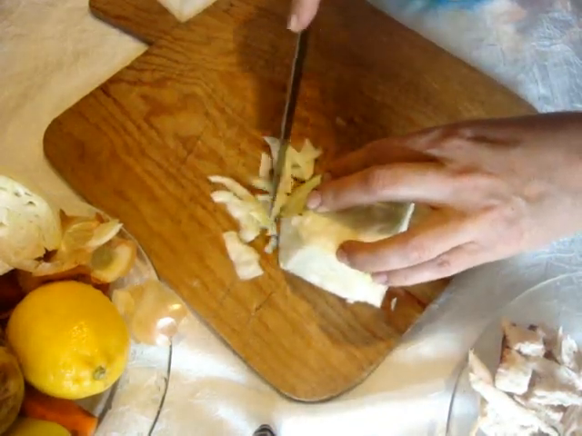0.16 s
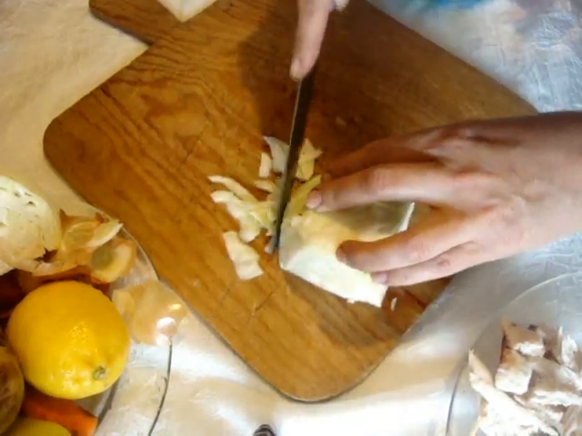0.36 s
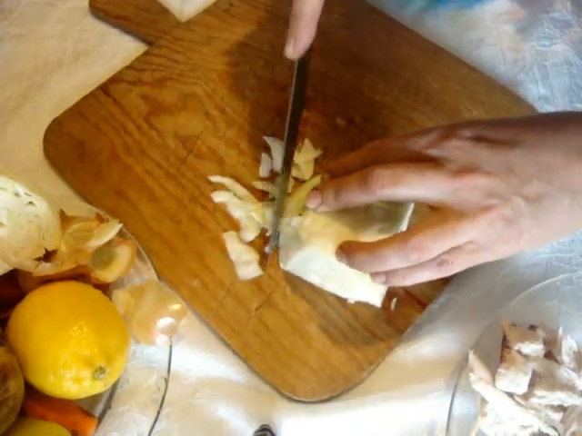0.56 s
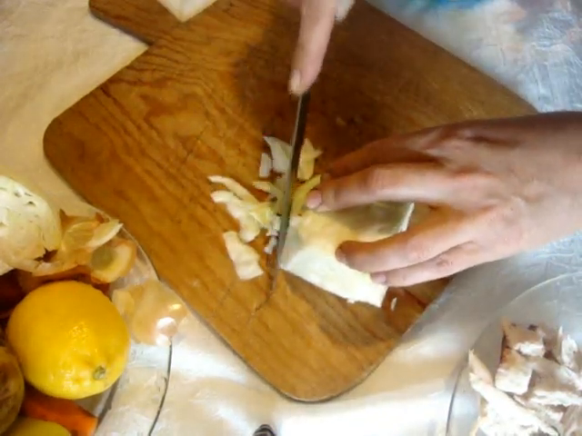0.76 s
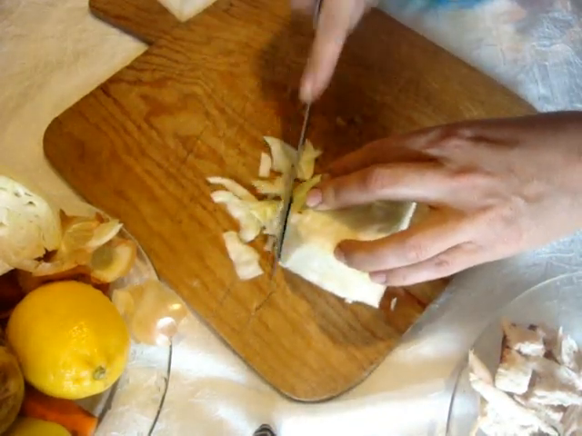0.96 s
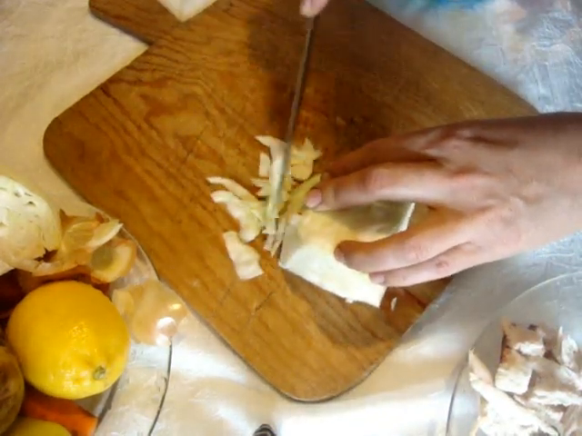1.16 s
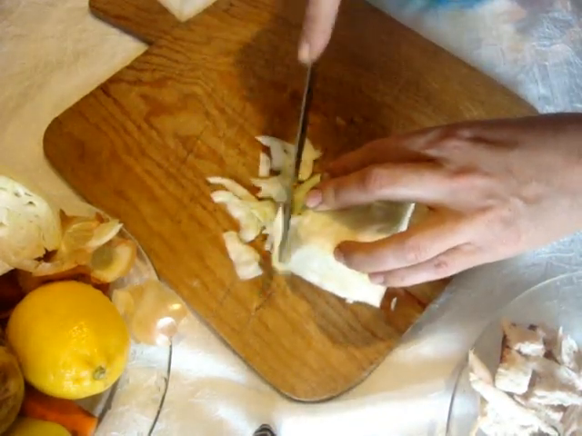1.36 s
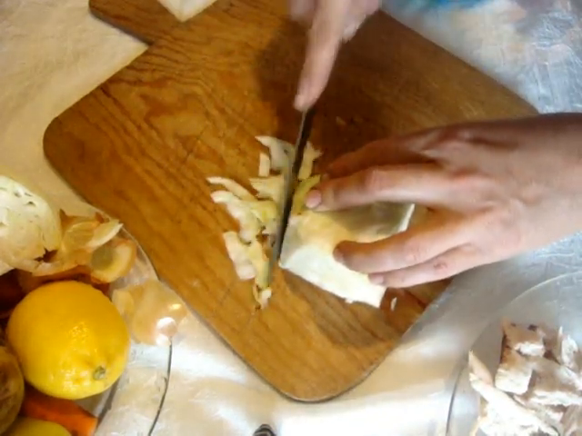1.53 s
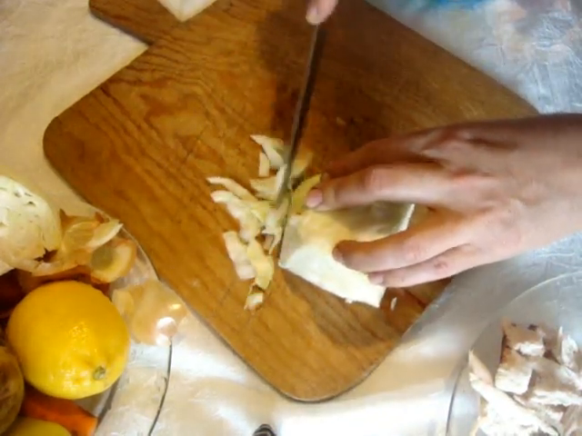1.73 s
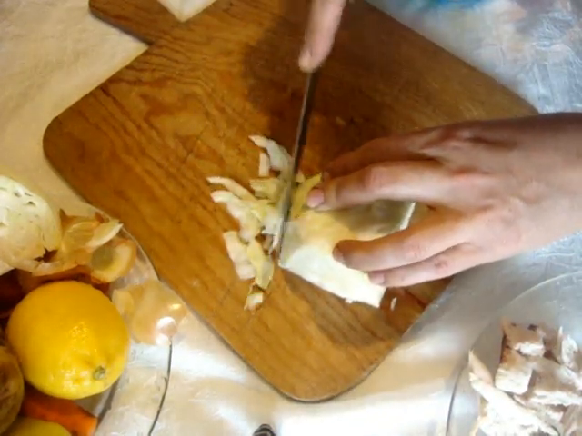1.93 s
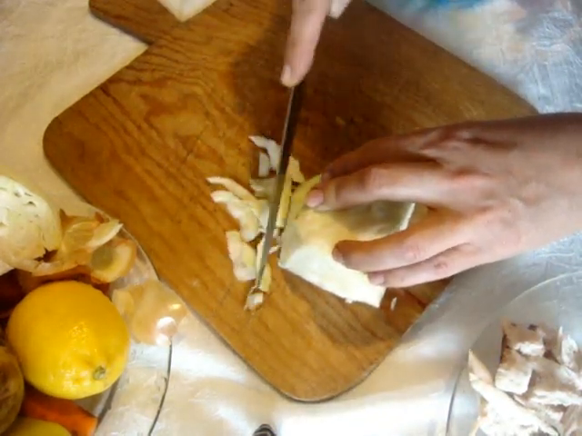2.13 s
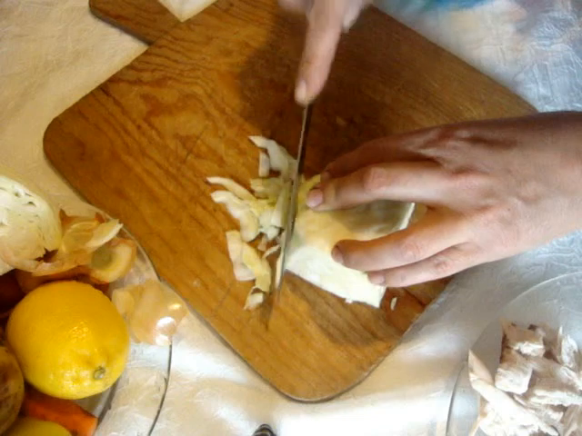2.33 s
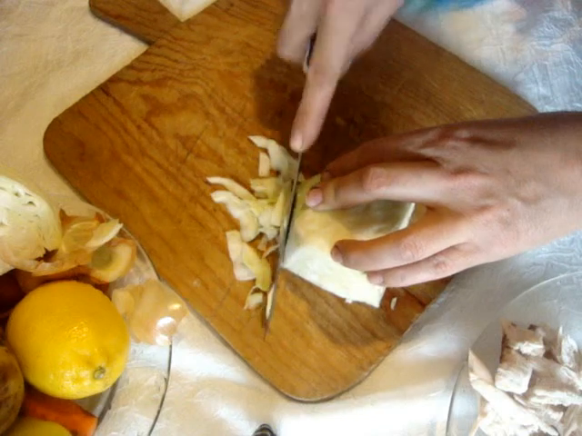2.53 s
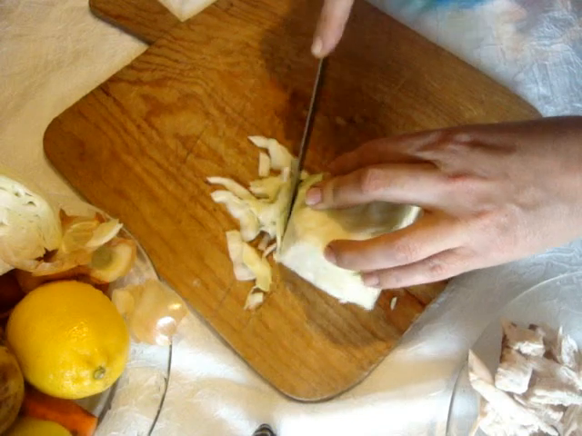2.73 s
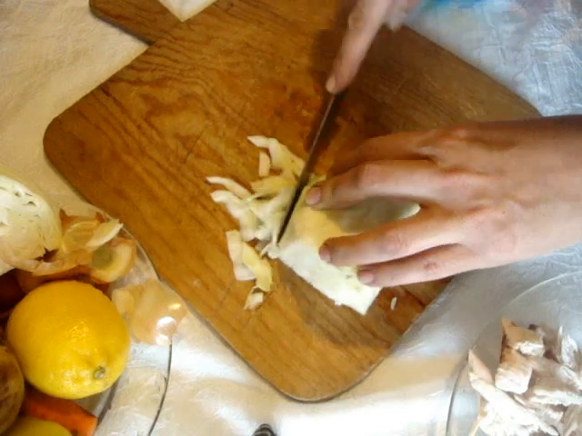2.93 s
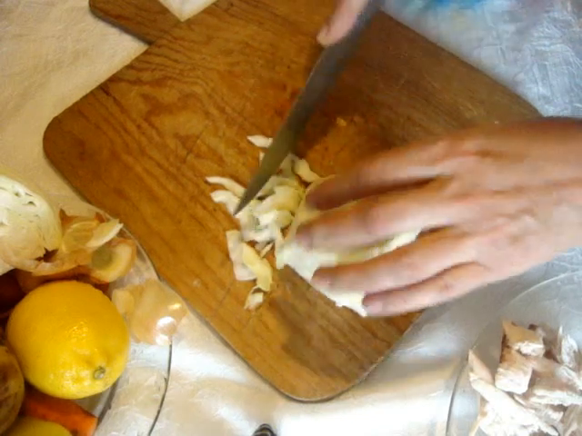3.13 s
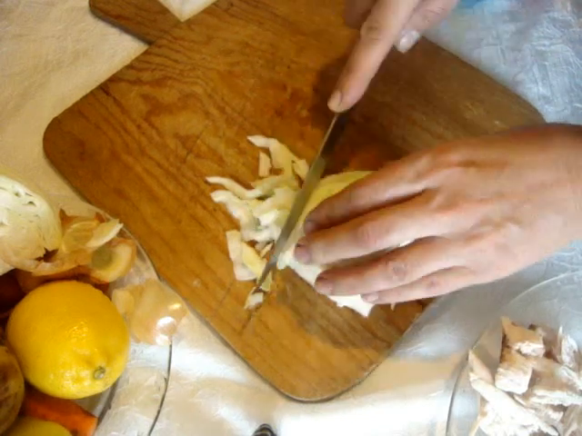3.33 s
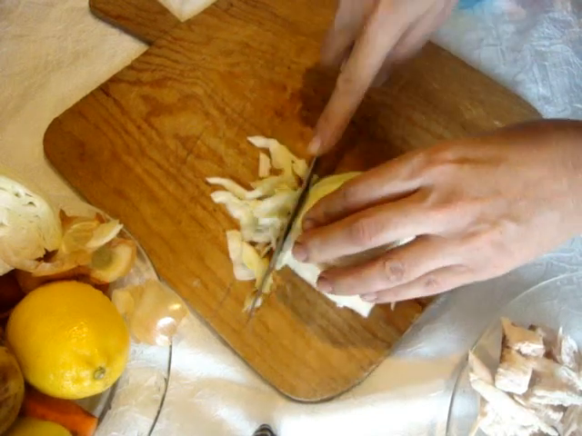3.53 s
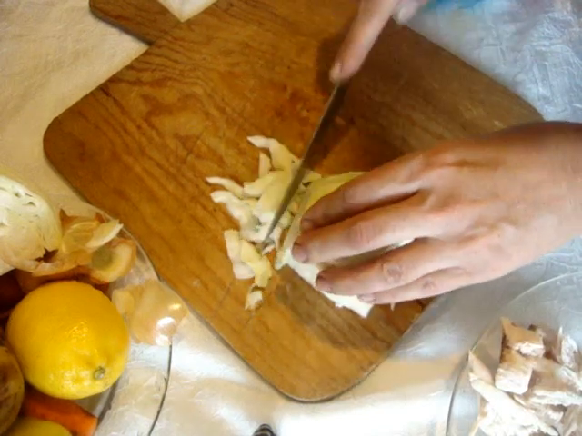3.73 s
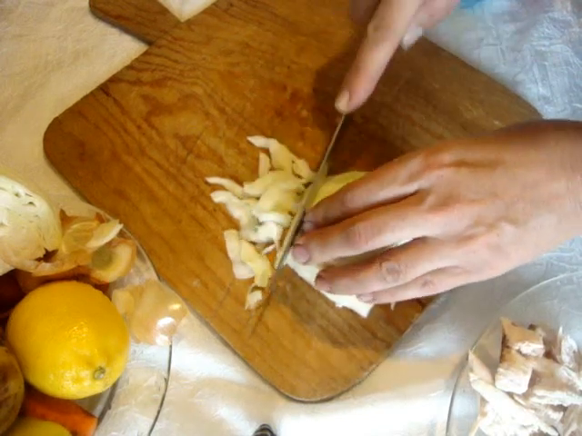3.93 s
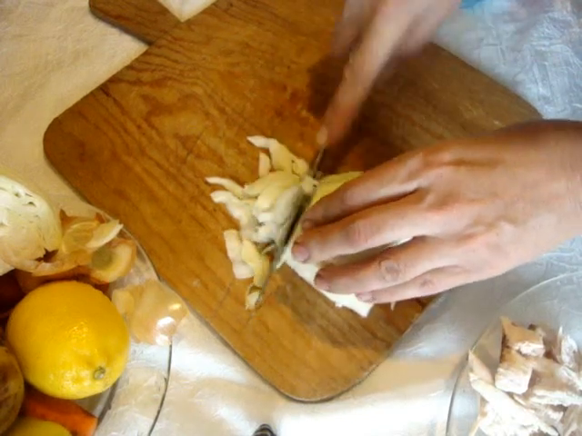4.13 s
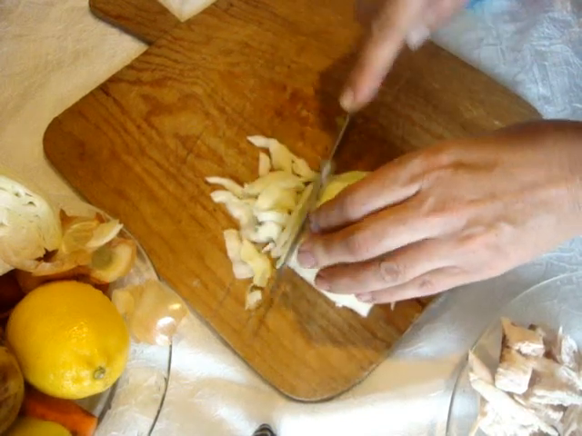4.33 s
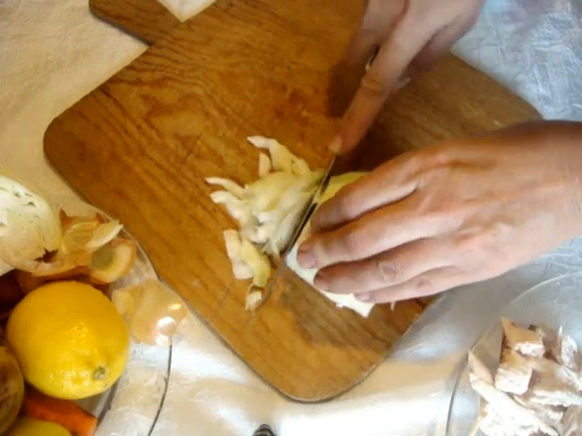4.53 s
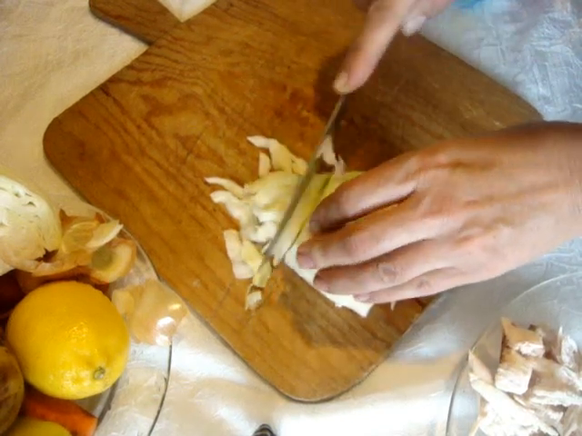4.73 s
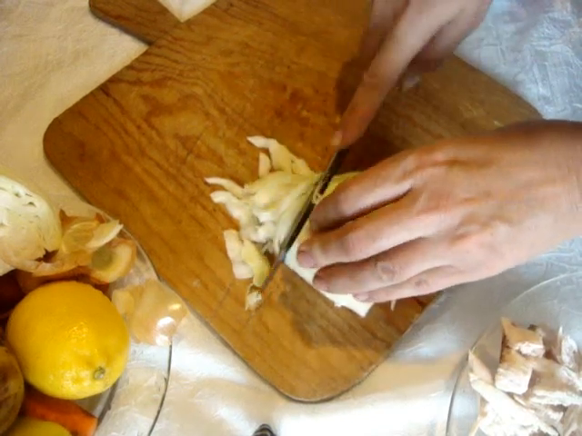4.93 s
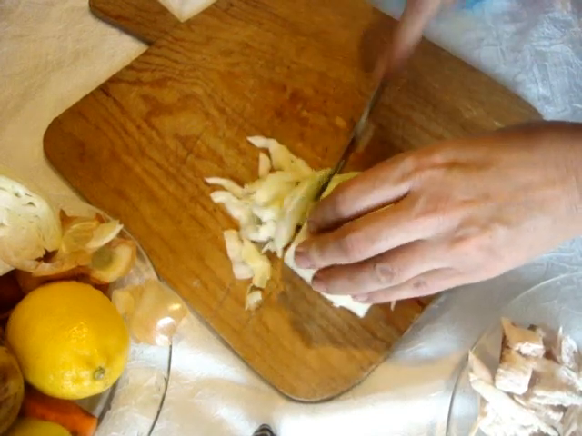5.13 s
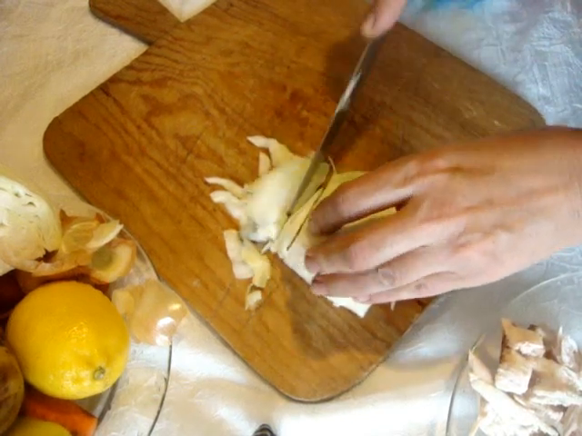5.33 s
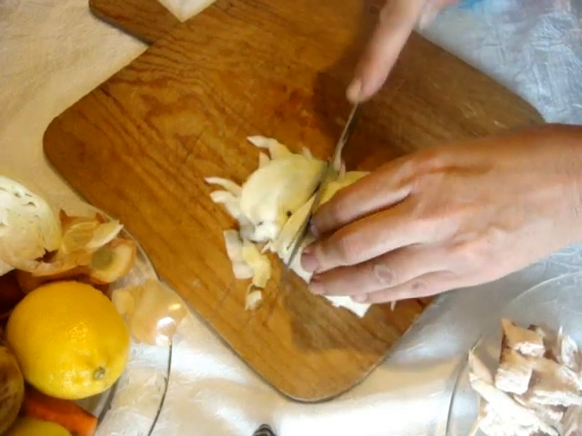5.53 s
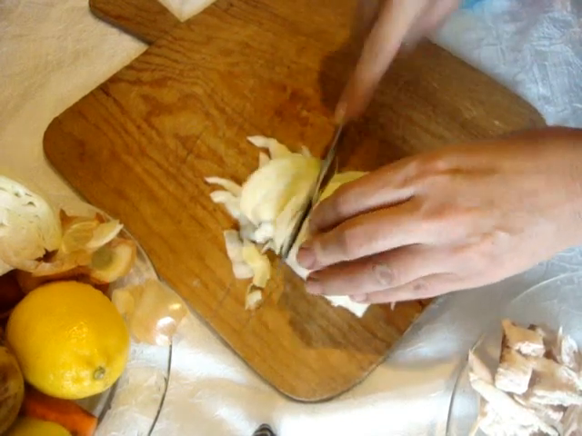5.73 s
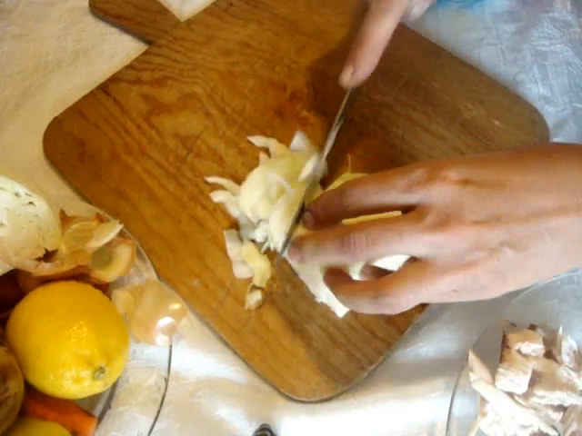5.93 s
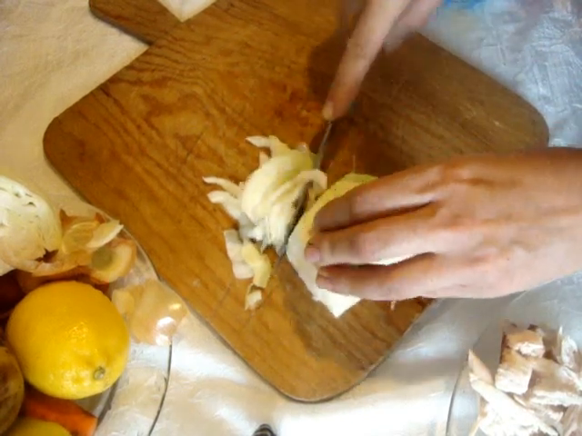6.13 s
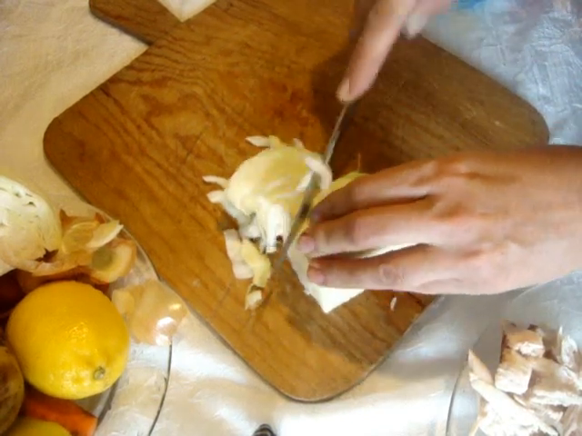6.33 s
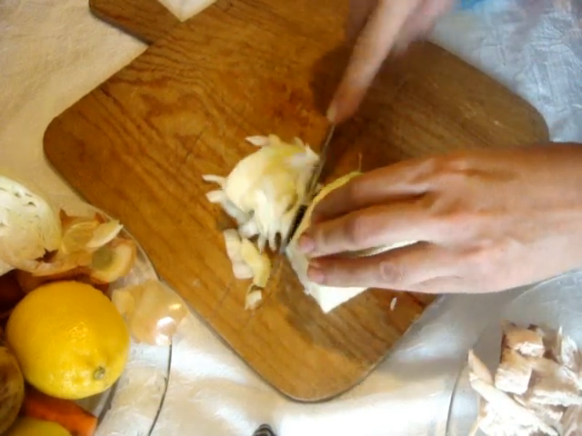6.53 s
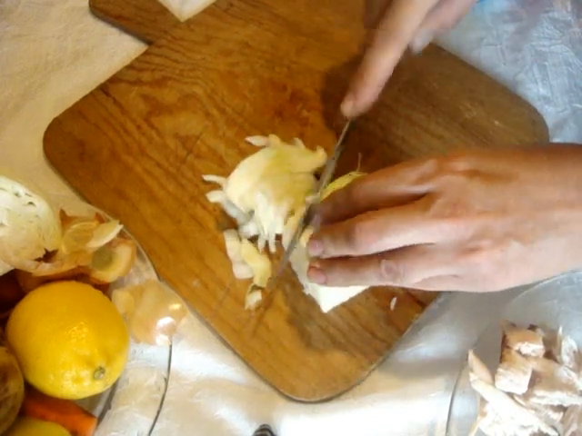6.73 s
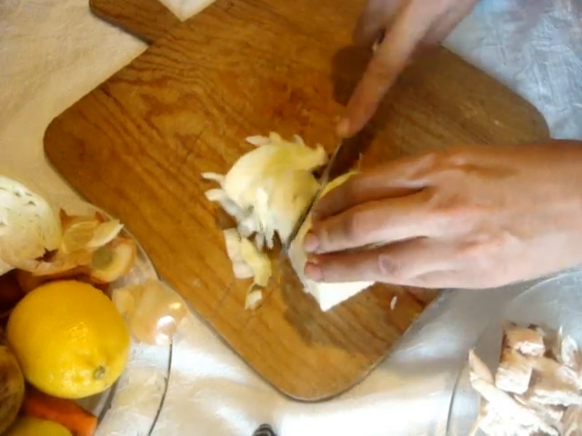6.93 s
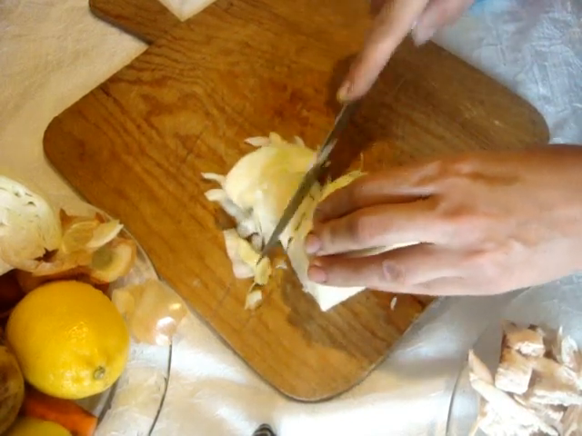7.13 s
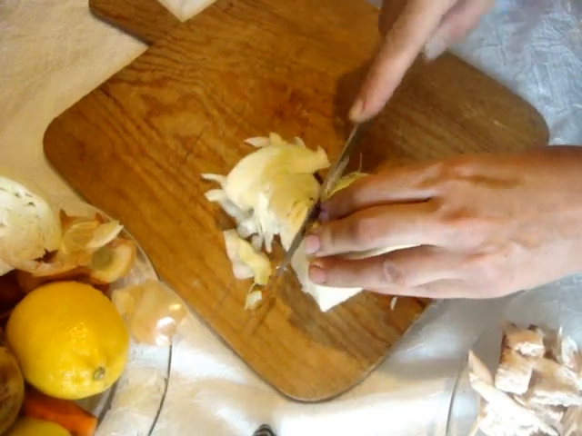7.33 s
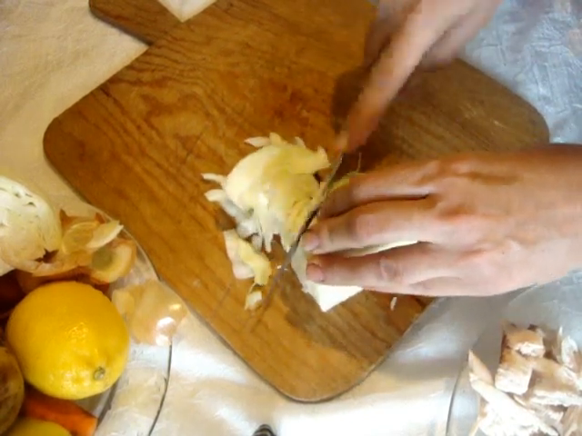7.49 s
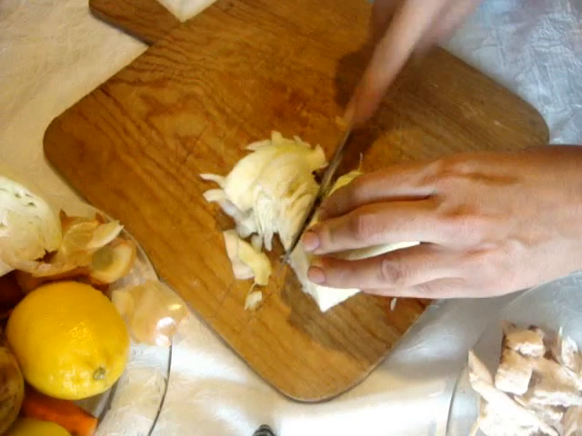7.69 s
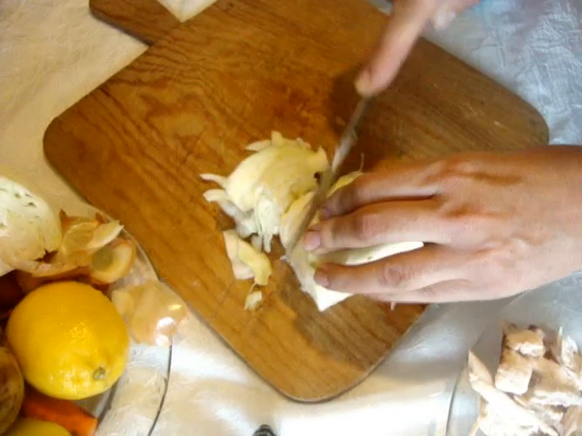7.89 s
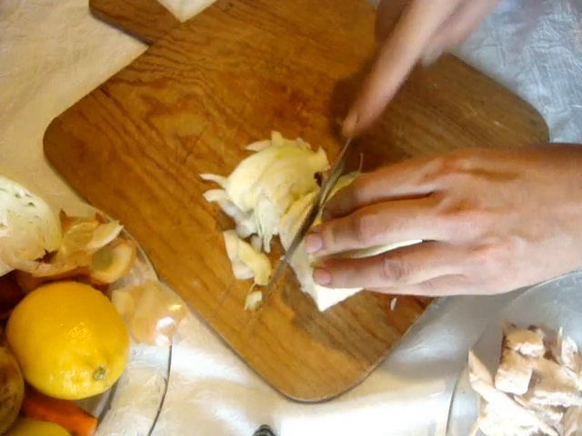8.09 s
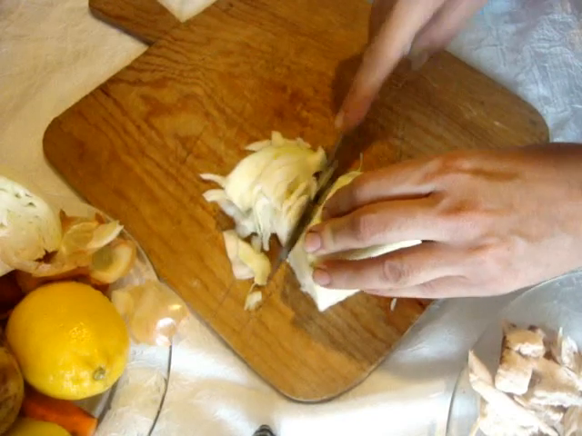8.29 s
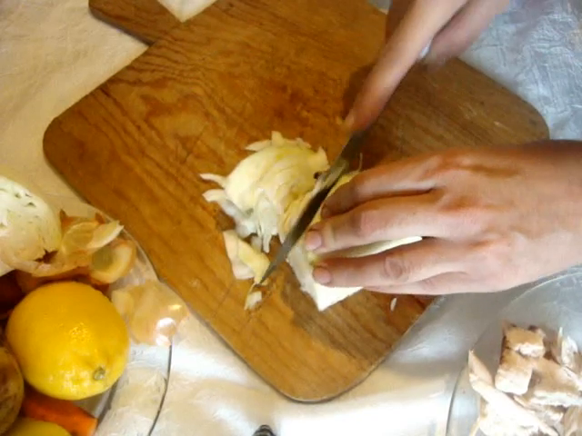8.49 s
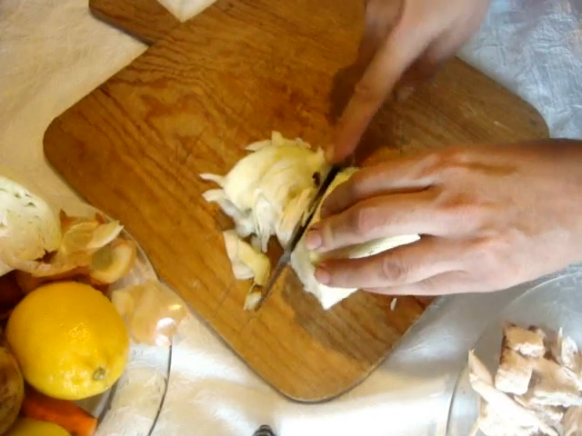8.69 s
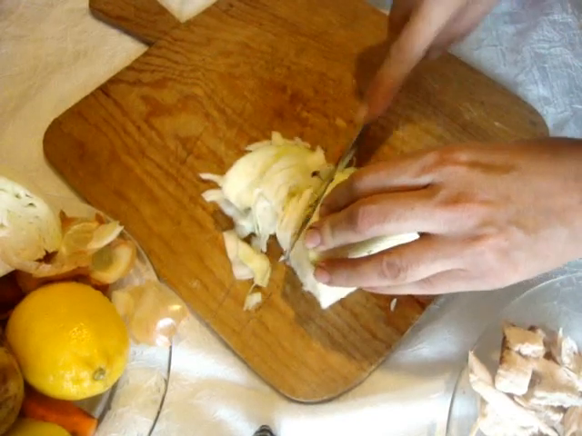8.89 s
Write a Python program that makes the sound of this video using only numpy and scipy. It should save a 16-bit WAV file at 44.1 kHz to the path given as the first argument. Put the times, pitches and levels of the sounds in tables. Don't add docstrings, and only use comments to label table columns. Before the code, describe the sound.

Regular cabbage slicing, roughly one cut every half second: a short rising crunch, sharp little snaps, then a hard knock of blade on board. Between cuts the blade drags back and shreds rustle faintly. The knocks grow strongest in the second half, then the last two soften. Close, dry, slightly lo-fi sound with short kitchen reverberation, dull treble limit and low background hiss.

```python
import sys
import numpy as np
from scipy import signal
from scipy.fft import rfft, irfft, next_fast_len
from scipy.io import wavfile
from scipy.ndimage import uniform_filter1d, minimum_filter1d

SR = 44100
rng = np.random.default_rng(int(sys.argv[2]) if len(sys.argv) > 2 else 0)


def to_wav(sig):
    pcm = np.clip(np.atleast_2d(sig), -1, 1) * 32767
    pcm = np.round(pcm).astype(np.int16)
    wavfile.write(sys.argv[1], SR, pcm.T)


def volts_from_db(level):
    exponent = np.asarray(level, float) / 20
    return 10 ** exponent


N = 394694

# f/Hz, level/dB
CRACKLE_COLOUR = [(300, -35.5), (1000, 2), (2000, 1.5), (3000, -3), (4500, -3), (6000, -4), (8000, -5),
                  (10000, -10.5)]
# bite t/s, stop t/s, bite level/dB, stop level/dB
CUT_STROKES = [(0.715, 0.779, -36.5, -32), (1.297, 1.418, -53.5, -33), (1.916, 2.003, -57.5, -49.5),
               (2.276, 2.435, -50.5, -25), (2.811, 2.857, -51.5, -29.5), (3.423, 3.507, -40, -28),
               (3.945, 4.037, -37, -22), (4.437, 4.503, -29.5, -23), (4.824, 4.899, -47, -22.5),
               (5.516, 5.614, -53.5, -24.5), (6.041, 6.044, -30.5, -23), (6.333, 6.416, -38.5, -23),
               (6.881, 6.891, -23, -25), (7.458, 7.484, -26.5, -22.5), (8.035, 8.075, -45.5, -28),
               (8.459, 8.562, -38, -28.5), (8.828, 8.915, -32.5, -34.5)]


def unit(x):
    return x / np.sqrt(np.mean(x ** 2))


def along(table, hz):
    points = np.array(table)
    return np.interp(np.log(hz + 1), np.log(points[:, 0]), points[:, 1])


def played(table, column=1):
    points = np.array(table)
    return np.interp(np.arange(N) / SR, points[:, 0], points[:, column])


def colour(x, table):
    cepstrum = irfft(np.log(volts_from_db(along(table, np.fft.rfftfreq(4096, 1 / SR)))))
    cepstrum[1:2048] *= 2
    cepstrum[2049:] = 0
    response = irfft(np.exp(rfft(cepstrum)))[:1024]
    return signal.fftconvolve(x, response)[:len(x)]


def add(out, s, x):
    i = int(s * SR)
    out[i:i + len(x)] += x[:max(len(out) - i, 0)]


def flicker(rate, depth_db):
    hold = int(SR / rate)
    steps = np.repeat(rng.standard_normal(N // hold + 1), hold)[:N]
    return volts_from_db(depth_db * uniform_filter1d(steps, hold))


def bursts(density, spread_db):
    sizes = volts_from_db(spread_db * rng.exponential(size=N)) * rng.standard_normal(N)
    return sizes * (rng.random(N) < density / SR)


def patchy(x, depth_db):
    size = next_fast_len(N)
    spectrum = rfft(x, size)
    octave = np.log2(np.fft.rfftfreq(size, 1 / SR) + 1)
    centres = np.log2([1500, 2500, 4000, 6000, 9000])
    out = np.zeros(N)
    for row in np.eye(len(centres)):
        band = irfft(spectrum * np.interp(octave, centres, row), size)[:N]
        out += band * flicker(90, depth_db)
    return out


def room_answer(rise_s):
    # f/Hz, T60/s
    room_decay = [(150, 0.055), (400, 0.27), (1040, 0.29), (2760, 0.18), (7280, 0.25)]
    t = np.arange(SR // 3) / SR
    noise = rfft(rng.standard_normal(len(t)))
    hz = np.fft.rfftfreq(len(t), 1 / SR)
    centres = 150 * 2. ** np.arange(7)
    tail = np.zeros(len(t))
    for centre, row in zip(centres, np.eye(len(centres))):
        share = np.interp(np.log(hz + 1), np.log(centres), row)
        tail += irfft(noise * share, len(t)) * volts_from_db(-60 * t / along(room_decay, centre))
    return tail * (1 - np.exp(-(t / rise_s) ** 2))


def hiss():
    # f/Hz, level/dB
    hiss_colour = [(15, -38.5), (25, -37.5), (172, -10), (227, -3.5), (414, -5.5), (482, -2.5), (574, -6),
                   (972, -5), (1130, -9), (2340, -12), (10000, -16.5), (13000, -75.5), (22000, -120)]
    # t/s, level/dB
    hiss_level = [(0, -54.5), (4.4, -55), (5, -56.5), (7.2, -57.5), (7.9, -58), (8.95, -55)]
    return unit(colour(rng.standard_normal(N), hiss_colour)) * volts_from_db(played(hiss_level)) * flicker(11, 1.0)


def strokes():
    # start t/s, fastest t/s, end t/s, crackle level/dB, hum over crackle/dB
    blade_sweeps = [(-.05, 0, 0.066, -41.5, 7.5), (0.59, 0.69, .702, -47.5, 5.5),
                    (0.86, 0.957, 1.035, -36, 1.5), (1.46, 1.605, 1.65, -40, 6),
                    (2.523, 2.63, 2.75, -47.5, 1.5), (2.875, 2.95, 3.08, -52, 3),
                    (4.346, 4.43, 4.52, -42.5, 7.5), (3.54, 3.666, 3.71, -45, -5),
                    (4.998, 5.06, 5.185, -41, 2.5), (5.928, 5.976, 6.145, -39.5, 7),
                    (6.676, 6.762, 6.8, -47, 16), (7.279, 7.344, 7.46, -46, 10.5),
                    (7.892, 7.92, 8.22, -56, 4.5), (8.38, 8.426, 8.77, -43, 1.5),
                    (8.898, 8.914, 8.8, -42, 7)]
    press_s, press_db = 0.023, -24
    bite_hum_db, stop_hum_db = 5.5, 2
    sweep_ends_db = -16
    cuts = [[(bite - press_s, db + press_db, bite_hum_db), (bite, db, bite_hum_db), (stop, stop_db, stop_hum_db)]
            for bite, stop, db, stop_db in CUT_STROKES]
    sweeps = []
    for start, fastest, end, db, hum_db in blade_sweeps:
        corners = []
        for u in np.linspace(-1, 1, 9):
            reach = end - fastest if u > 0 else fastest - start
            corners.append((fastest + u * reach, db + sweep_ends_db * u ** 2, hum_db))
        sweeps.append(corners)
    return cuts + sweeps


def snaps():
    # t/s, peak level/dB, length/ms
    rib_snaps = [(.2924, -35, 1.3), (1.976, -30, 3.3), (2.2882, -35, 6.6), (2.479, -28.5, 3.2),
                 (2.562, -31.5, 2.2), (2.8505, -27, 2.4), (3.397, -32, 6.1), (3.423, -28, 5),
                 (3.478, -26, 4.9), (3.9579, -16.5, 1.1), (3.9844, -19.5, 2.2), (4.3531, -25, 1.6),
                 (4.3634, -29.5, 1), (4.408, -22, 4.8), (4.431, -22, 5.2), (5.538, -25.5, 8.2),
                 (5.5764, -22, 3.9), (6.351, -17.5, 4.7), (6.391, -21, 6.7), (6.7068, -26.5, 2.6),
                 (6.724, -16.5, 3.8), (6.873, -19.5, 4), (7.332, -22.5, 3), (8.3888, -37, 2.3),
                 (7.9726, -25, 1.6), (8.0431, -18.5, 5.2), (8.8173, -23.5, 2.9)]
    # t/s, peak level/dB
    shred_cracks = [(.269, -41), (0.708, -23), (0.76, -28), (0.993, -30), (1.359, -35), (1.944, -31),
                    (2.46, -35), (2.8316, -25), (2.962, -36), (3.916, -31.5), (3.941, -29), (4.3184, -42),
                    (4.388, -32), (4.8, -30.5), (4.85, -23), (5.07, -38), (5.5082, -23.5), (5.954, -44),
                    (6.334, -31.5), (6.4455, -20.5), (6.9104, -14), (7.283, -40), (7.305, -35),
                    (7.574, -31), (8.027, -24), (8.4136, -33), (8.844, -14.5)]
    # first t/s, spacing/ms, first level/dB, last level/dB
    layer_runs = [
        (6.6765, 16.37, -35, -22.5),
        (7.32, 19.4, -20.5, -24),
    ]
    rib_hum_db, shred_hum_db = 4.5, -2.5
    shred_s, layer_s, layers = 0.00244, 0.00395, 7
    events = [(s, db, rib_hum_db, ms / 1000) for s, db, ms in rib_snaps]
    events += [(s, db, shred_hum_db, shred_s) for s, db in shred_cracks]
    for s, gap_ms, db, last_db in layer_runs:
        for k in range(layers):
            layer_db = db + (last_db - db) * k / (layers - 1)
            events.append((s + k * gap_ms / 1000, layer_db, rib_hum_db, layer_s))
    return events


def cutting():
    # f/Hz, level/dB
    hum_colour = [(80, -22), (150, -11), (280, -5), (480, 5), (620, -1), (760, 8), (1270, 3.5), (2000, 2.5),
                  (3000, -27.5)]
    t = np.arange(N) / SR
    crackle_gain, hum_gain = np.zeros(N), np.zeros(N)
    for stroke in strokes():
        s, db, hum_db = np.transpose(stroke)
        fade_in = np.clip((t - s[0]) / 0.0016, 0, 1)
        fade_out = np.clip((s[-1] - t) / 0.009 + 1, 0, 1)
        edge = fade_in * fade_out
        crackle_gain += edge * volts_from_db(np.interp(t, s, db))
        hum_gain += edge * volts_from_db(np.interp(t, s, db + np.minimum(hum_db, 14)) - 5.0)
    for s, db, hum_db, length in snaps():
        u = np.arange(SR // 30) / SR / length
        puff = u * np.exp(1 - u) * np.exp(-.2 * u ** 2)
        add(crackle_gain, s, puff * volts_from_db(db - 7.0))
        add(hum_gain, s, puff * volts_from_db(db + hum_db - 8.5))
    cells = unit(bursts(14000, 1.8) * flicker(120, 1.6))
    crackle = unit(patchy(colour(cells, CRACKLE_COLOUR), 2.6)) * crackle_gain
    hum = colour(cells * hum_gain, hum_colour) / np.std(colour(cells, hum_colour))
    answer = room_answer(0.0024)
    sent_to_room = hum * volts_from_db(-5.5) + crackle * volts_from_db(-14.5)
    wet = signal.fftconvolve(sent_to_room, answer / np.linalg.norm(answer))[:N]
    return crackle + hum + wet


def knocks():
    # t/s, peak level/dB, room answer level/dB, tilt/(dB per octave)
    board_blows = [(0.3172, -9, -9.5, 0.5), (0.7816, -24, -6.5, -8.5), (1.005, -25, -8, 7),
                   (1.1092, -36, -6, 1), (1.4225, -6, -10, -0.5), (1.5247, -26, -13, 0),
                   (1.9833, -11.5, -10.5, 2.5), (2.4344, -7, -6.5, 3.5), (2.8592, -12, -10, 0.5),
                   (3.5078, 2, -6.5, -4.5), (4.0387, -4, -6.5, -3), (4.5063, -2, -2, 0.5),
                   (4.9072, -5.5, -8, -2.5), (5.623, 0, -4, 1.5), (6.0458, -2.5, -10, -4),
                   (6.4145, 4, -5.5, -1.5), (6.8879, -1.5, -0.5, 1.5), (7.4871, -3.5, -4.5, 3),
                   (8.0791, -4, -7.5, -2.5), (8.5635, -18.5, -13.5, -0.5), (8.8504, -13.5, -16, -2)]
    # f/Hz, level/dB, T60/s
    mid_modes = [(285, -17.5, .06), (413, -6.5, .04), (531, 3.5, 0.036), (741, 5.5, 0.13), (896, -2, 0.051),
                 (1244, -1, 0.11), (1336, 7.5, 0.048), (1570, 15, 0.01), (1880, -16, 0.032),
                 (2000, -14, .02), (2640, -9.5, 0.018)]
    # f/Hz, level/dB, T60/s
    rim_modes = [(295, -6.5, 0.073), (413.4, -6.5, .1), (500, 3.5, .04), (745, 0.5, 0.074), (890, 3.5, .05),
                 (1200, -15.5, 0.033), (1310, -10, 0.12), (1490, -2, 0.017), (1808, -4.5, 0.032),
                 (2025, -24, 0.036), (2830, -13.5, 0.018)]
    # f/Hz, level/dB
    mid_room = [(88, -56.5), (150, -43.5), (263, -6), (361, -12), (742, -3), (983, -4.5), (1210, 1),
                (1640, -7), (2060, -3.5), (3250, -22), (5310, -26.5), (10000, -47.5), (13000, -85.5),
                (22000, -120)]
    # f/Hz, level/dB
    rim_room = [(88, -67), (150, -32), (257, -5), (362, -12.5), (409, -5.5), (630, -5.5), (758, -6),
                (1120, -16), (1260, -9.5), (1620, -14), (6000, -39.5), (7800, -47), (13200, -120)]
    # t/s, t/s
    mid_board_span = (3.2, 8.3)
    out = np.zeros(N)
    t = np.arange(SR // 5) / SR
    same_walls = room_answer(.007)
    for s, db, room_db, tilt_db in board_blows:
        db = min(db, -1.5)
        rim = not mid_board_span[0] < s < mid_board_span[1]
        hz, mode_db, t60 = (c[:, None] for c in np.transpose(rim_modes if rim else mid_modes))
        spot = rng.standard_normal((3, len(hz), 1))
        gain = volts_from_db(mode_db + tilt_db * np.log2(hz / 1000) + 2.5 * spot[0] - 60 * t / t60)
        ring = gain * np.sin(2 * np.pi * hz * (1 + .006 * spot[1]) * t + 2 * spot[2])
        contact_ms = 0.31 if rim else 0.27
        u = (t[:128] - .001) / (.7 * contact_ms / 1000)
        swing = (u ** 2 - 1) * np.exp(-u ** 2 / 2)
        blow = ring.sum(axis=0) * (1 - np.exp(-(t / 0.00055) ** 2))
        blow = signal.lfilter(*signal.butter(2, 200, "highpass", fs=SR), blow)
        tick = colour(rng.standard_normal(len(t)) * np.exp(-t / .0015), CRACKLE_COLOUR)
        add(out, s, volts_from_db(db + 2.5) * swing)
        add(out, s + .001, volts_from_db(db - 4 + 3.7 * rim) * blow / np.abs(blow).max())
        add(out, s + 0.00042, volts_from_db(db - 13.5) * tick / np.abs(tick).max())
        walls = same_walls + room_answer(.007)
        shape = rim_room if rim else mid_room
        answer = colour(walls, [(f, v + .5 * tilt_db * np.log2(f / 1000)) for f, v in shape])
        add(out, s + .001, volts_from_db(db + room_db - 11 - 3.2 * rim) * answer / np.std(answer[:SR // 30]))
    return out


def scraping():
    # start t/s, lift t/s, level/dB
    grain_scrapes = [
        (.9, 1.045, -42),
        (1.55, 1.645, -42),
        (.99, 1.02, -34),
        (5.03, 5.185, -42),
    ]
    # t/s, half length/s, level/dB
    shred_rustles = [
        (0.34, 0.014, -45),
        (7.668, 0.046, -46),
        (2.635, .03, -46),
        (8.76, .04, -50.5),
        (5.6, .02, -46),
        (6.92, 0.028, -37.5),
    ]
    # low f/Hz, high f/Hz
    rustle_band = [3660, 8060]
    scrape_hz, scrape_width_hz = 1620, 620
    t = np.arange(N) / SR
    drag, flutter = np.zeros(N), np.zeros(N)
    for start, lift, db in grain_scrapes:
        drag += volts_from_db(db) * np.interp(t, [start, start + .7 * (lift - start), lift], [0, 1, 0])
    for s, half, db in shred_rustles:
        flutter += volts_from_db(db) * np.exp(-((t - s) / half) ** 4)
    chatter = signal.iirpeak(scrape_hz, scrape_hz / scrape_width_hz, fs=SR)
    grains = signal.lfilter(*chatter, bursts(4000, 1.5) * flicker(70, 3))
    grains = signal.lfilter(*chatter, grains)
    treble = signal.butter(3, rustle_band, "bandpass", fs=SR, output="sos")
    rustle = signal.sosfilt(treble, bursts(9000, 2.5))
    return unit(grains) * drag + unit(patchy(rustle, 3)) * flutter


def table_top():
    # t/s, level/dB
    hand_thumps = [
        (1.85, -64),
        (3.3, -68),
        (3.42, -57),
        (3.87, -56),
        (4.33, -53),
        (5.55, -58),
        (5.95, -63),
        (7.94, -59),
    ]
    rest_db, over_cut_db = -80, -39
    rise_db_s, fall_db_s = 98.5, 123
    thump_s = .02
    t = np.arange(N) / SR
    lean = volts_from_db(rest_db)
    for _, stop, _, stop_db in CUT_STROKES:
        slope = np.where(t < stop, rise_db_s, fall_db_s)
        lean = lean + volts_from_db(stop_db + over_cut_db - slope * np.abs(t - stop))
    for s, db in hand_thumps:
        lean = lean + volts_from_db(db) * np.exp(-((t - s) / thump_s) ** 2)
    band = signal.butter(2, [70, 150], "bandpass", fs=SR, output="sos")
    return unit(signal.sosfilt(band, rng.standard_normal(N))) * lean


def squeak():
    # t/s, f/Hz, level/dB
    squeak_glide = [(8.86, 1800, -50), (8.868, 1650, -34), (8.888, 1200, -29), (8.905, 980, -34),
                    (8.92, 850, -52)]
    phase = 2 * np.pi * np.cumsum(played(squeak_glide) * flicker(300, 0.26)) / SR
    tone = np.sin(phase) + 0.29 * np.sin(2 * phase) + 0.22 * np.sin(3 * phase)
    t = np.arange(N) / SR
    moving = (t > squeak_glide[0][0]) & (t < squeak_glide[-1][0])
    return tone * volts_from_db(played(squeak_glide, column=2)) * flicker(200, 2.5) * moving


def scene():
    return (hiss() + cutting() + knocks() + scraping() + table_top() + squeak())[None]


def starve(x, own_db, mask_db):
    _, _, z = signal.stft(x, nperseg=256, padded=True)
    power = uniform_filter1d(np.abs(z) ** 2, size=5, axis=0)
    power = uniform_filter1d(power, size=2, axis=1)
    loudest_near = -minimum_filter1d(-power, size=15, axis=1, origin=-1)
    treble = np.clip(np.fft.rfftfreq(256, 1 / SR)[:, None] / 5000, 0, 1.2) ** 3
    floor = loudest_near * volts_from_db(2 * own_db) * (.15 + 2 * treble)
    floor = floor + loudest_near.max(axis=0) * volts_from_db(2 * mask_db) * treble
    blocks = rng.standard_normal((power.shape[0] // 6 + 1, power.shape[1] // 3 + 1))
    blocks = np.kron(blocks, np.ones((6, 3)))
    floor = floor * volts_from_db(11 * blocks[:power.shape[0], :power.shape[1]])
    return signal.istft(z * (power > floor), nperseg=256)[1][:len(x)]


def band_limit(x):
    return signal.sosfilt(signal.butter(12, 10420, fs=SR, output="sos"), x)


def record(dry):
    mic = signal.butter(1, 25, "highpass", fs=SR, output="sos")
    top_cut = signal.ellip(10, .3, 75, 9932, fs=SR, output="sos")
    x = signal.sosfilt(mic, dry[0])
    x = x / (1 + np.abs(x / .95) ** 4) ** .25
    x = starve(x, own_db=-18.5, mask_db=-48)
    mix = signal.sosfilt(top_cut, x)[None]
    return band_limit(mix)


dry = scene()
out = record(dry)
to_wav(out)
```